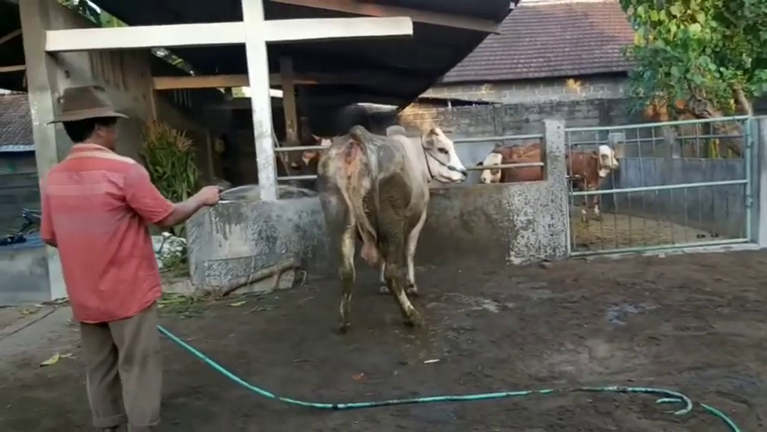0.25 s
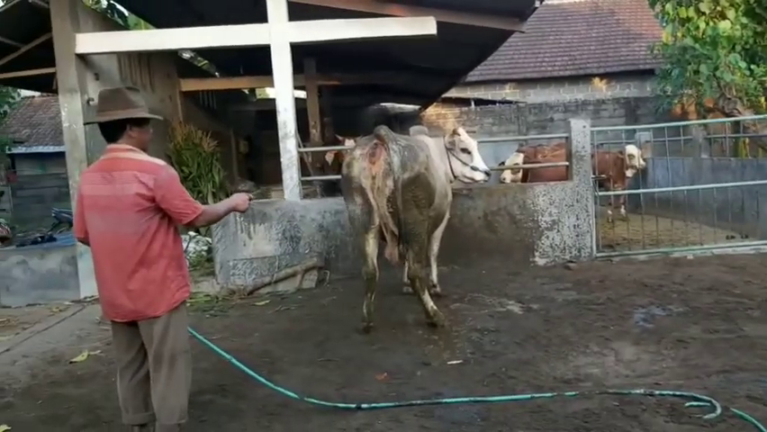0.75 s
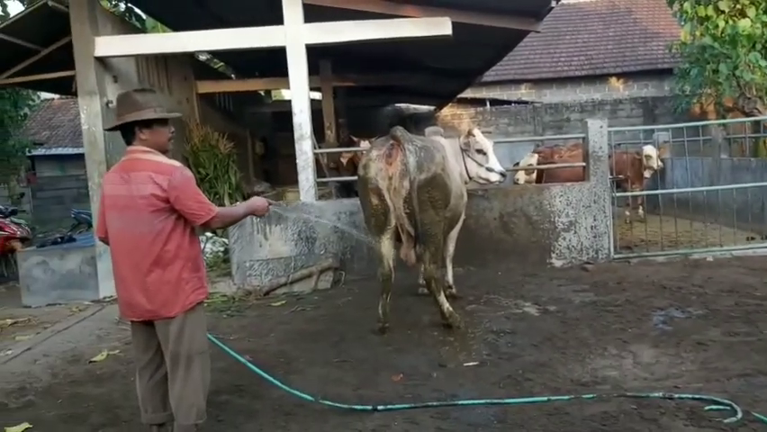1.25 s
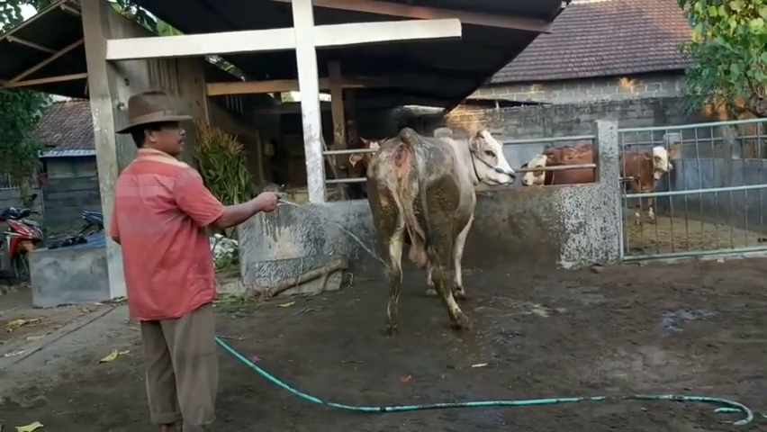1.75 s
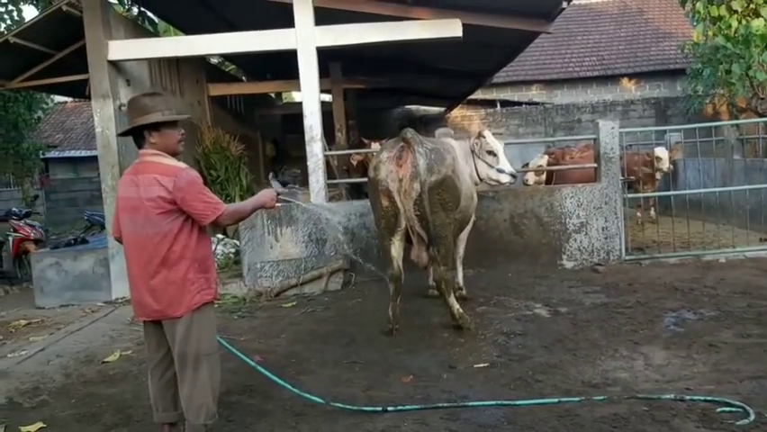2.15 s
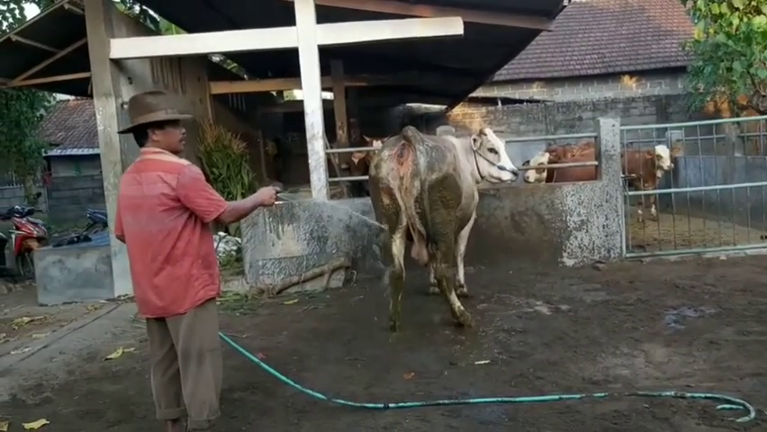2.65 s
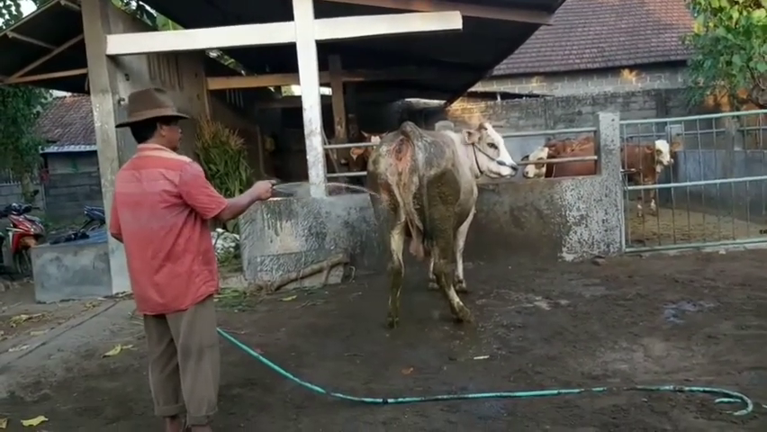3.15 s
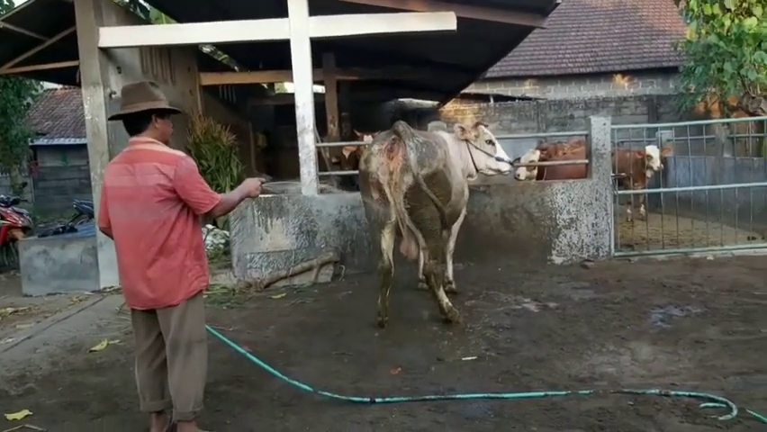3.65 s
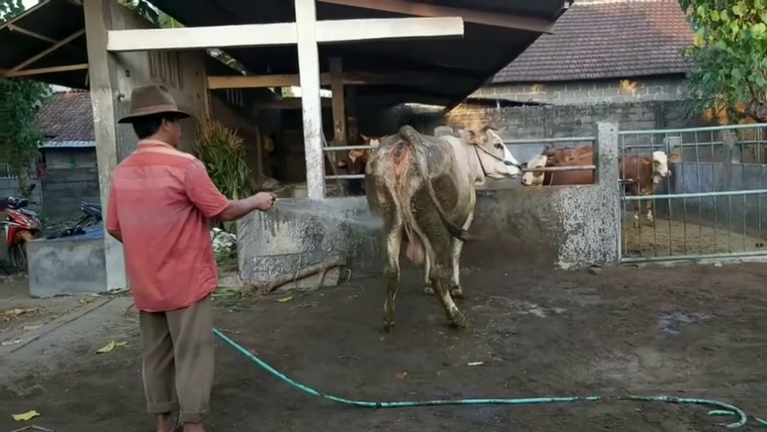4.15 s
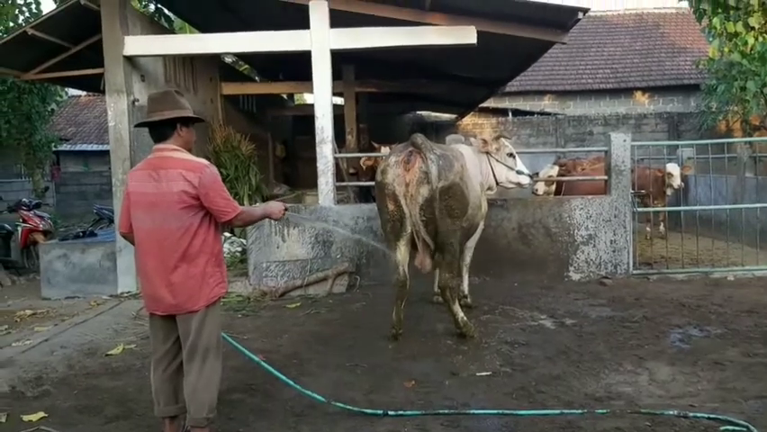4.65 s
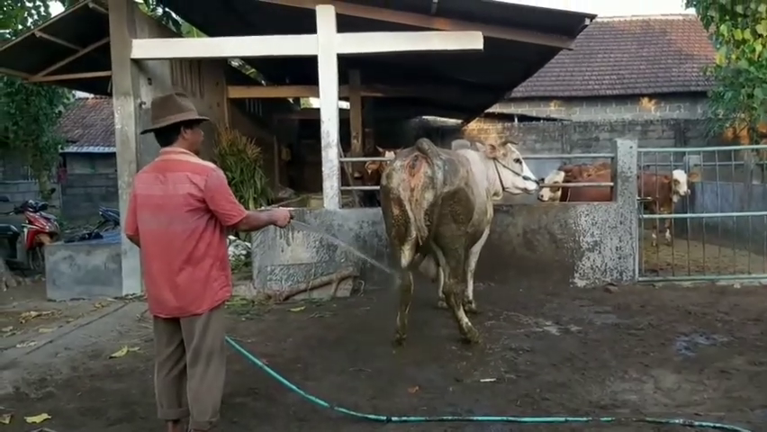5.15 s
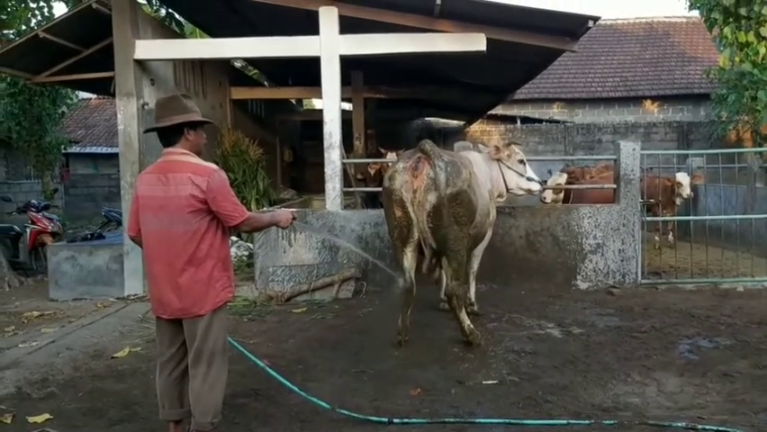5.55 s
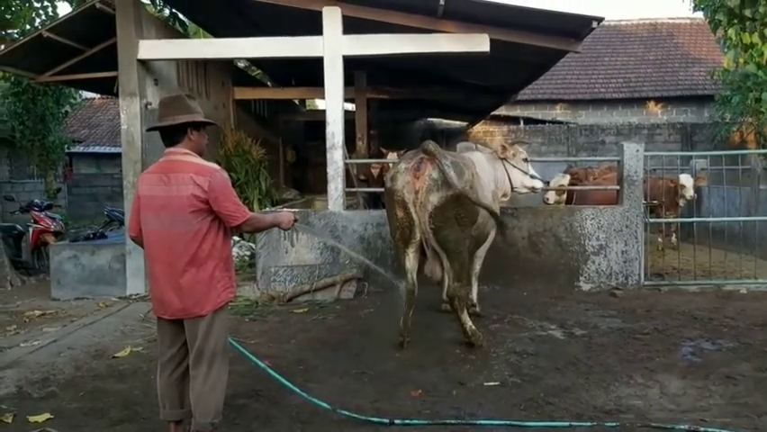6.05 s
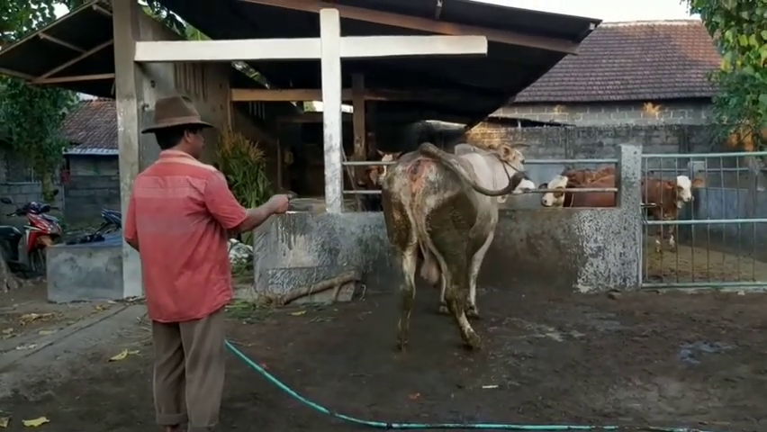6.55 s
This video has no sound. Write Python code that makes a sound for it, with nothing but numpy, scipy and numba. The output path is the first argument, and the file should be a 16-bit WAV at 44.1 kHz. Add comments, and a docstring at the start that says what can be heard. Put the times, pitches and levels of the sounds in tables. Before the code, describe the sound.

Several lowing calls climb from low moans to harsh, distorted bellows ending in breathy gasps; faint hum and hiss, a dropout, then a brief last low.

```python
"""Cattle low in a farm pen: seven calls, most of them rising. Three swell to a bellow that overloads the
recorder and ends in a hoarse gasp. Pulses of air ring throat resonances; a gasp rings them with noise alone.
A low buzz made of repeating spikes, faint coloured-noise hiss and a few thin clicks lie underneath.
A short wash of noise echoes the cattle. Shortly before the end all sound drops out, then a last call starts."""
import sys
import numpy as np
from scipy import signal
from scipy.fft import rfft, irfft
from scipy.io import wavfile
from scipy.ndimage import uniform_filter1d
from numba import njit

SR = 44100
rng = np.random.default_rng(int(sys.argv[2]) if len(sys.argv) > 2 else 0)


def int16_out(signal):
    """Quantize to a 16-bit WAV file."""
    q = np.round(np.clip(np.atleast_2d(signal).T, -1, 1) * 32767)
    wavfile.write(sys.argv[1], SR, q.astype(np.int16))


N = 300689

# Overtones of the buzz, relative to each other: (frequency [Hz], level [dB])
BUZZ_OVERTONES = [(59, -37), (100, -5.5), (158, -14.5), (227, -0.5), (468, -6.5), (522, -11), (611, -5),
                  (1780, -10.5), (3500, -23), (4300, -35), (5590, -59), (9460, -120)]
# Colour of the hiss, relative along the spectrum: (frequency [Hz], level [dB])
HISS_COLOUR = [(18, -64), (30, -19.5), (109, -8), (173, -6.5), (232, -3.5), (399, -7.5), (462, -3.5),
               (513, -10), (581, -4.5), (4400, -14), (5720, -59), (9680, -120)]
BUZZ_HZ = 116.05
BUZZ_DB, HISS_DB = -44.5, -46   # levels around which buzz and hiss waver

# How each call moves: (time [s], pitch [Hz], low resonances [dB], middle resonances [dB], mouth opening [0-1])
CALL_1 = [(.43, 194, -69, -80, .25), (.476, 203.5, -67, -57.5, 0), (.58, 226.4, -59, -48, .25),
          (.61, 232.6, -58, -40.5, 0.4), (.7, 253.6, -32.5, -33.5, 0.53), (.76, 264.8, -30.5, -35.5, 0.8),
          (.78, 265.2, -31, -32, 0.4), (.852, 277.3, -32, -29, 0.6), (.944, 289.4, -35.5, -27.5, 0.76),
          (1.008, 293.8, -38, -26, 0.96), (1.138, 290.3, -36, -26.5, 0.9), (1.17, 264, -25.5, -27.5, 0.8),
          (1.22, 256, -62, -60, 0.9)]
CALL_2 = [(1.27, 135.9, -60, -69, 0.24), (1.326, 140.7, -42, -47, 0.11), (1.476, 154.1, -35.5, -42.5, 0.25),
          (1.526, 159.6, -38, -40, 0.34), (1.707, 171.5, -33, -39.5, 0.063),
          (1.829, 178.3, -30.5, -38, 0.044), (1.845, 184.5, -27, -26, 0.43), (1.906, 195.8, -25, -19, 0.61),
          (1.944, 236.2, -19.5, -17, 0.7), (2.003, 346.3, -12.5, -7, 0.66), (2.04, 367.3, -11.5, -9.5, .75),
          (2.088, 387.7, -9.5, -4, 0.63), (2.145, 354, -10, -6.5, 0.63), (2.173, 292, -11.5, -11.5, 0.69),
          (2.204, 284, -47.5, -40, 0.25)]
CALL_3 = [(2.77, 130.2, -62, -68, .1), (2.812, 134.5, -46.5, -46.5, .09), (2.91, 139.3, -38.5, -41, .06),
          (3.056, 148.3, -37, -41.5, .03), (3.15, 144.1, -40, -42, 0.15), (3.271, 139.7, -42.5, -39, 0.68),
          (3.305, 135, -43, -43.5, 0.84), (3.34, 140, -59, -62, .5)]
CALL_4 = [(3.399, 185.8, -59, -68, 0.25), (3.498, 197.5, -33.5, -47, 0.44),
          (3.578, 209.7, -29.5, -44, 0.45), (3.632, 211.6, -30, -39.5, 0.44),
          (3.741, 229.3, -34.5, -34.5, 0.78), (3.803, 228.5, -35, -33.5, 0.35),
          (3.838, 198.1, -29, -40, .6), (3.872, 189.4, -37, -53, .6)]
CALL_5 = [(3.62, 147.6, -61, -60, .6), (3.695, 152.4, -46, -42, 0.89), (3.861, 161.1, -47.5, -47, 0.43),
          (3.885, 168, -36.5, -43.5, .64), (4.067, 176.1, -31, -39.5, 0.75), (4.115, 179.5, -30, -39, .5),
          (4.13, 177, -25, -25, 0.45), (4.268, 184.9, -23.5, -26, 0.62), (4.312, 205.4, -22.5, -24, 0.85),
          (4.37, 314.2, -14.5, -12, 0.72), (4.414, 390.6, -10.5, -6, .92), (4.458, 397.4, -10, -1.5, 1),
          (4.49, 363, -12.5, -9.5, 1), (4.508, 329.2, -11.5, -8, 1), (4.529, 286, -22, -16.5, 0.85),
          (4.555, 273, -47, -49, .94)]
CALL_6 = [(4.71, 110.7, -73, -62, .07), (4.752, 142.9, -46, -41.5, 0.043),
          (4.831, 177.6, -36.5, -30.5, 0.026), (4.97, 202.8, -36, -26, 0.009),
          (4.988, 211.2, -22, -14.5, 0.18), (5.097, 252.7, -13, -7.5, 0.48),
          (5.178, 301.7, -16, -3.5, 0.46), (5.208, 374.8, -6, -5.5, .63), (5.224, 406, -15.5, -2.5, 0.69),
          (5.26, 372, -11, -5, 0.81), (5.308, 386.6, -4.5, -6, .98)]
# The sixth call breaks up into this held bellow; same columns:
# (time [s], pitch [Hz], low resonances [dB], middle resonances [dB], mouth opening [0-1])
BELLOW_6 = [(5.304, 417.5, -11.5, -3.5, 1), (5.405, 430.9, -13, -9, 1), (5.457, 430.5, -10, -7, 0.95),
            (5.607, 439.1, -9.5, -3.5, 0.89), (5.651, 430.8, -10, -3.5, .98),
            (5.669, 407, -13.5, -2.5, 0.84), (5.681, 381.5, -5, -7, 0.87), (5.692, 424, -27.5, -19.5, 0.88),
            (5.709, 430, -50.5, -47, 0.62)]
# The last call, same columns: (time [s], pitch [Hz], low resonances [dB], middle resonances [dB], mouth [0-1])
CALL_7 = [(6.64, 146.6, -67.5, -74, .01), (6.65, 144.1, -35, -45, .02), (6.728, 155, -33, -43, .46),
          (6.818, 151.2, -31, -38.5, .98)]

# Throat and mouth resonances of each call, with levels relative inside each frequency group:
# (frequency [Hz], width [Hz], level with mouth shut [dB], level with mouth wide [dB])
THROAT_1 = [(300, 91, -18, -11), (523, 54, 11, 3), (894, 112, -26, -13), (1424, 150, -8, 2),
            (1608, 120, 3, -2), (1970, 180, -3, -1), (2260, 290, 2, -16.5), (2790, 100, -3, 10.5),
            (3497, 154, 0.5, 3)]
THROAT_2 = [(357, 80, -11, -7.5), (534, 100, -4.5, 11.5), (793, 45, 7, -7.5), (1060, 170, -2.5, 8),
            (1636, 111, -0.5, -1), (1847, 80, -9.5, -21), (2211, 130, -9.5, 5.5), (2894, 307, 1, -14.5),
            (3393, 83, -53, -22)]
THROAT_3 = [(354, 360, 6, -5), (684, 170, -22, -2), (780, 160, 20, -5), (1080, 73, 14, -6),
            (1446, 115, 0.5, 8.5), (2150, 270, -11, -7), (2940, 150, 1, -4), (3770, 49, 8.5, 11)]
THROAT_4 = [(400, 210, -16, -13), (635, 233, 9, -15), (818, 87, 5, 16.5), (1080, 180, -8, -1.5),
            (1478, 140, -1, 4), (1990, 790, -2, -11.5), (2940, 470, -16.5, -22), (3670, 190, -4, -12)]
THROAT_5 = [(320, 330, 0, -6.5), (636, 150, -16, -0.5), (877, 138, -8.5, 12), (1028, 53, -12.5, 1),
            (1598, 117, -6, 10), (1885, 130, 11, -12.5), (2308, 97, -26, 7), (2720, 610, -15.5, -14.5),
            (3470, 89, -4.5, -12)]
THROAT_6 = [(443, 210, -10.5, -14), (593, 290, 12.5, -9.5), (878, 210, -18, -8), (1061, 243, -2, -0.5),
            (1387, 190, 0, -38.5), (1649, 204, -2.5, 15.5), (2298, 205, -5.5, 6.5), (2907, 220, -5, -13),
            (3433, 95, -1, -10)]
THROAT_7 = [(330, 210, 5.5, -5.5), (637, 170, 2.5, 7), (820, 135, 0.5, -5), (1107, 230, -1, -1),
            (1620, 570, -4.5, -5), (2320, 620, -9, -13), (3050, 610, -3.5, -22), (3950, 71, 6, -11)]
# The highest resonance mostly sinks and weakens as pitch rises: (pitch [Hz], resonance [Hz], level [dB])
TOP_RESONANCE = [(137, 4154, 2), (184, 4245, 10), (200, 3840, 3), (260, 3720, -2), (390, 3660, -12.5)]
# Balance of each call: (chest at the base level [dB], share of the low swing the chest follows [0-1],
# high against middle at the base pitch [dB], change of that with pitch [dB per octave])
BALANCE = [(-47.5, 0.12, 8, -28.5), (-41.5, 0.7, 3.5, -10), (-38, 0.69, -4.5, -4), (-64, .05, -1, -7.5),
           (-35.5, 0.21, -2.5, -11), (-37.5, .75, 0, -13.5), (-32.5, 0.9, -1.5, -0.5),
           (-41.5, 0.75, 4.5, -1.5)]
BASE_HZ, BASE_DB = 200, -35   # pitch and low-resonance level at which the balance is given
CHEST_LEAD_DB = 9             # the chest may be at most this much above the low resonances
# The treble of the calls swells and dips: (time [s], level change [dB])
TREBLE = [(.47, 5.5), (.6, -5), (.7, 1.5), (.78, -2.5), (.85, 2), (1.0, 0.7), (1.35, -3), (1.53, -4),
          (1.83, 5.5), (1.85, -2.5), (1.91, -1.5), (2.04, 5), (2.087, -7.5), (2.14, -2), (2.9, -1.7),
          (3.15, 2), (3.3, -4.5), (3.63, 4), (3.75, -0.5), (4.0, 1), (4.115, 7.5), (4.13, -4.5),
          (4.31, 2.8), (4.4, 2.5), (4.458, -9), (4.49, 3.5), (4.53, -1.7), (4.97, 0.5), (5.1, -4),
          (5.18, -7), (5.21, 3.5), (5.31, -3.5), (5.405, 5), (5.6, -2), (5.7, -2.5)]

# Strained spells: (start [s], end [s], added roughness [0-1], depth of a three-cycle pattern [0-1])
STRAIN = [(.76, .785, .25, 0), (1.15, 1.22, .15, 0), (5.06, 5.2, .05, 0), (5.205, 5.315, .7, 0),
          (5.43, 5.55, .17, .3), (5.55, 5.7, .12, .55)]
STRAIN_EDGE_S = .03
# roughness when calm, for fast pitch glides, and for pitch above the easy range
CALM_ROUGH, ROUGH_PER_OCTAVE_PER_S, ROUGH_PER_OCTAVE_UP, EASY_HZ = .055, .008, .17, 280

# Clicks: (time [s], level before the gain below [dB])
TICKS = [(1.3882, -60), (1.503, -49), (1.6057, -39), (4.043, -42.5), (4.8833, -50)]
TICK_LOW_HZ, TICK_FALL_HZ, TICK_GAIN_DB = 3000, 3000, 32.5   # high-pass, low-pass, gain ahead of both

# Gasps after the bellows: (start [s], rise [s], level [dB], hold [s], fade [dB per s])
GASPS = [(2.212, 0.028, -24, 0.05, 152), (4.558, 0.014, -23, 0.08, 309), (5.731, 0.027, -27.5, 0.0085, 450)]
# Throat resonances of each gasp: (frequency [Hz], width [Hz], relative level [dB])
GASP_THROAT_1 = [(348, 49, 4.5), (605, 170, 5), (758, 33, 6.5), (990, 420, 2.5), (1634, 134, 0.5),
                 (3220, 280, -7)]
GASP_THROAT_2 = [(334, 58, -2), (737, 290, 8.5), (940, 180, 6), (1570, 110, 4.5), (2380, 150, -46.5),
                 (3500, 200, -16)]
GASP_THROAT_3 = [(612, 89, -6), (865, 61, -4), (1070, 95, -4), (1660, 230, -5), (2260, 51, -1),
                 (3350, 59, -15)]
GASP_RISE_DB, GASP_LENGTH_S = 21, .3

BAND_HZ = 4426   # the narrow sound channel ends here
DROPOUT_START_S, DROPOUT_END_S = 6.207, 6.647
CUTOFF_HZ = 15900


def amp(db):
    """Turn decibels into a gain."""
    return 10 ** (np.asarray(db) / 20)


def at_hz(points, hz):
    """Read a spectrum in dB, with straight lines over log frequency."""
    point_hz, point_db = np.transpose(points)
    return np.interp(np.log(hz), np.log(point_hz), point_db)


def flutter(hz, size):
    """Random wavering: noise low-passed at hz and scaled to a spread of 1."""
    x = signal.sosfilt(signal.butter(2, hz, fs=SR, output="sos"), rng.standard_normal(size))
    return x / x.std()


def buzz():
    """A train of downward spikes: one cycle, summed from overtones, is read round and round."""
    turn = np.linspace(0, 1, 2049)
    cycle = np.zeros(len(turn))
    for k in range(1, 38):
        cycle -= amp(at_hz(BUZZ_OVERTONES, k * BUZZ_HZ)) * np.cos(2 * np.pi * k * turn)
    wander = 0.0089 * flutter(3.7, size=N)   # in cycles
    position = (BUZZ_HZ * np.arange(N) / SR + wander) % 1
    spikes = np.interp(position, turn, cycle)
    return amp(BUZZ_DB + 1.0 * flutter(19, size=N)) * spikes / spikes.std()


def hiss():
    """Noise with a shaped spectrum; quick random level changes make it crackle slightly."""
    white = rng.standard_normal(N) * amp(1.8 * flutter(250, size=N))
    hz = np.fft.rfftfreq(N, 1 / SR) + 1   # the 1 avoids the log of zero
    shaped = irfft(rfft(white) * amp(at_hz(HISS_COLOUR, hz)), N)
    return amp(HISS_DB) * shaped / shaped.std()


def span(rows):
    """Give the sample numbers a timed table covers and its columns, sample by sample."""
    s, *columns = np.transpose(rows)
    at = np.arange(round(s[0] * SR), min(round(s[-1] * SR), N))
    return at, [np.interp(at / SR, s, column) for column in columns]


def resonate(x, hz, width):
    """Ring one resonance, with a gain of about 1 at its peak."""
    r = np.exp(-np.pi * width / SR)
    pass_in = np.array([1, 0, -1]) * (1 - r * r) / 2
    ring = [1, -2 * r * np.cos(2 * np.pi * hz / SR), r * r]
    return signal.lfilter(pass_in, ring, x)


def steep(x, hz, width, skirt=1.9):
    """A resonance followed by a wider one, which leaves darker valleys between peaks."""
    return resonate(resonate(x, hz, width), hz, skirt * width)


@njit
def glide(x, twice_cos, r):
    """A resonance whose centre moves sample by sample."""
    y = np.zeros(len(x))
    for i in range(2, len(x)):
        y[i] = (1 - r * r) / 2 * (x[i] - x[i - 2]) + r * twice_cos[i] * y[i - 1] - r * r * y[i - 2]
    return y


def even(x, window_s):
    """Divide out the running level, so that a level curve can be put on afterwards."""
    size = int(window_s * SR)
    power = uniform_filter1d(uniform_filter1d(x ** 2, size=size), size=size)
    return x / np.sqrt(power + 1e-12)


def soft_ends(size, fade_s):
    """A gain that fades in and out."""
    edge = np.minimum(np.arange(size), np.arange(size)[::-1])
    return np.clip(edge / (fade_s * SR), 0, 1)


def folds(at, pitch_hz):
    """Vocal folds give one sharp puff a cycle; roughness makes timing and strength uneven and adds air noise."""
    jitter, shimmer, breath = 0.055, 0.45, 0.94   # timing, strength and air per unit of roughness
    fall_hz = 6000                                # larger means brighter puffs
    t = at / SR
    glide_rate = uniform_filter1d(np.abs(np.gradient(np.log2(pitch_hz))) * SR, size=1300)   # octaves per s
    spells = np.array([np.clip(np.minimum(t - start, end - t) / STRAIN_EDGE_S + .5, 0, 1)
                       for start, end, *_ in STRAIN])
    strain, third = np.array(STRAIN)[:, 2:].T @ spells
    octaves_up = np.maximum(np.log2(pitch_hz / EASY_HZ), 0)
    rough = CALM_ROUGH + ROUGH_PER_OCTAVE_PER_S * glide_rate + strain + ROUGH_PER_OCTAVE_UP * octaves_up

    cycles = np.cumsum(pitch_hz) / SR
    phase = 2 * np.pi * (cycles + jitter * rough * flutter(120, size=len(at)))
    r = np.exp(-pitch_hz / fall_hz)   # each overtone is r times the one below
    puffs = (r * np.cos(phase) - r * r) / (1 - 2 * r * np.cos(phase) + r * r)
    puffs = puffs * np.sqrt(pitch_hz / 2400)
    strength = 1 + shimmer * rough * flutter(260, size=len(at)) + third * np.cos(phase / 3 + 1)
    air = breath * rough * rng.standard_normal(len(at)) * (1 + np.cos(phase))
    return air - puffs * strength


def call(rows, throat, balance):
    """Puffs ring the throat: the mouth recolours it, the chest swells less, rising pitch drains the highs."""
    at, (pitch_hz, low_db, middle_db, mouth) = span(rows)
    mouth = np.clip(mouth, 0, 1)
    source = folds(at, pitch_hz)
    groups = np.zeros((4, len(at)))   # chest, low, middle, high
    for k, (hz, width, shut_db, wide_db) in enumerate(throat):
        gain = (-1) ** k * amp(shut_db + mouth * (wide_db - shut_db))   # neighbours have opposite signs
        group = np.searchsorted([480, 1250, 2600], hz)   # borders in Hz
        groups[group] += gain * steep(source, hz, width)

    at_pitch, resonance_hz, resonance_db = np.transpose(TOP_RESONANCE)
    top_hz = np.interp(pitch_hz, at_pitch, resonance_hz)
    top_gain = amp(np.interp(pitch_hz, at_pitch, resonance_db))
    top_r = np.exp(-np.pi * 160 / SR)   # 160 Hz wide
    groups[-1] += top_gain * glide(source, 2 * np.cos(2 * np.pi * top_hz / SR), top_r)

    chest, low, middle, high = (even(g, .055) for g in groups)
    chest_base_db, chest_share, high_base_db, high_slope = balance
    chest_db = chest_base_db + chest_share * (low_db - BASE_DB)
    chest_db = np.minimum(chest_db, low_db + CHEST_LEAD_DB)
    treble_db = np.interp(at / SR, *np.transpose(TREBLE))
    high_db = high_base_db + high_slope * np.log2(pitch_hz / BASE_HZ) + treble_db
    upper = middle + amp(high_db) * high
    voice = amp(chest_db) * chest + amp(low_db) * low + amp(middle_db) * upper
    out = np.zeros(N)
    out[at] = voice * soft_ends(len(at), 0.0016)
    return out


def shed(x):
    """Roof and walls give a short wash: the sound is smeared by a burst of decaying noise."""
    t = np.arange(int(.3 * SR)) / SR
    fading = amp(-60 * t / 0.38)   # falls at 60 dB per 0.38 s
    tail = rng.standard_normal(len(t)) * fading * (t > .006)
    return signal.fftconvolve(x, tail / np.sqrt(np.sum(tail ** 2)))[:N]


def ticks():
    """Single-sample clicks, thinned by a high-pass and dulled by a low-pass filter."""
    s, db = np.transpose(TICKS)
    clicks = np.zeros(N)
    clicks[(s * SR).astype(int)] = amp(db + TICK_GAIN_DB)
    thin = signal.butter(4, TICK_LOW_HZ, "high", fs=SR, output="sos")
    dull = signal.butter(2, TICK_FALL_HZ, fs=SR, output="sos")
    return signal.sosfilt(np.vstack([thin, dull]), clicks + 1e-18)


def gasp(event, throat):
    """Air rushes through slack, fluttering folds: noise rings the throat, swells, holds and fades."""
    start, rise, level_db, hold, fade = event
    held = start + rise + hold
    end = start + GASP_LENGTH_S
    at, (db,) = span([(start, level_db - GASP_RISE_DB), (start + rise, level_db),
                      (held, level_db), (end, level_db - fade * (end - held))])
    air = rng.standard_normal(len(at)) * amp(2.3 * flutter(47, size=len(at)))
    rung = amp(-24) * air   # a little air stays uncoloured
    for k, (hz, width, ring_db) in enumerate(throat):
        rung = rung + (-1) ** k * amp(ring_db) * steep(air, hz, width)
    out = np.zeros(N)
    out[at] = amp(db) * even(rung, .03) * soft_ends(len(at), .004)
    return out


def scene():
    """Calls and gasps in the pen, with their wash, over buzz and hiss."""
    calls = (CALL_1, CALL_2, CALL_3, CALL_4, CALL_5, CALL_6, BELLOW_6, CALL_7)
    throats = (THROAT_1, THROAT_2, THROAT_3, THROAT_4, THROAT_5, THROAT_6, THROAT_6, THROAT_7)
    gasp_throats = (GASP_THROAT_1, GASP_THROAT_2, GASP_THROAT_3)
    cattle = sum(map(call, calls, throats, BALANCE)) + sum(map(gasp, GASPS, gasp_throats))
    mix = cattle + amp(-20) * shed(cattle) + buzz() + hiss()
    return mix[None]   # one channel


def record(dry):
    """A slow converter overloads lopsidedly, so distortion folds back as rasp; top cut, peaks clipped again."""
    slow = signal.resample_poly(dry, 1, 4, axis=1)   # a quarter of the sample rate
    lopsided = (slow - .12 * slow ** 2) / .86
    squeezed = 0.79 * lopsided / (1 + lopsided ** 6) ** (1 / 6)
    full = signal.resample_poly(squeezed, 4, 1, axis=1, window=("kaiser", 12.0))[:, :N]
    full = signal.sosfiltfilt(signal.cheby2(12, 40, 5700, fs=SR, output="sos"), full)
    narrow = signal.sosfiltfilt(signal.cheby2(16, 30, BAND_HZ, fs=SR, output="sos"), full)

    # loud sound spills past the edge of the channel
    loudness = np.tanh(uniform_filter1d(full ** 2, size=2048) / 0.037)
    leak = amp(-19) * loudness * (full - narrow)
    clipped = np.clip(narrow + leak + ticks(), -.92, .92)
    t = np.arange(N) / SR
    sounding = (t < DROPOUT_START_S) | (t > DROPOUT_END_S)
    return signal.sosfilt(signal.cheby2(20, 60, CUTOFF_HZ, fs=SR, output="sos"), clipped * sounding)


dry = scene()
out = record(dry)
int16_out(out)
```